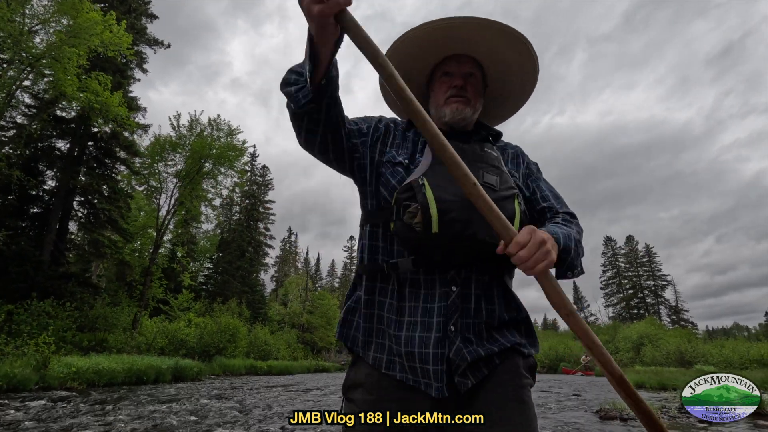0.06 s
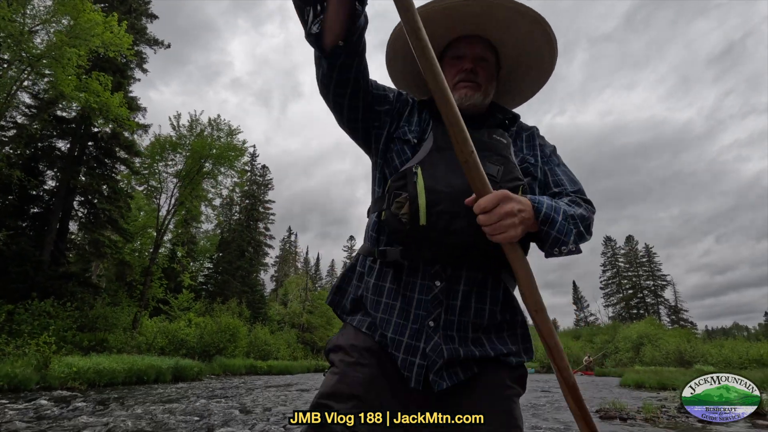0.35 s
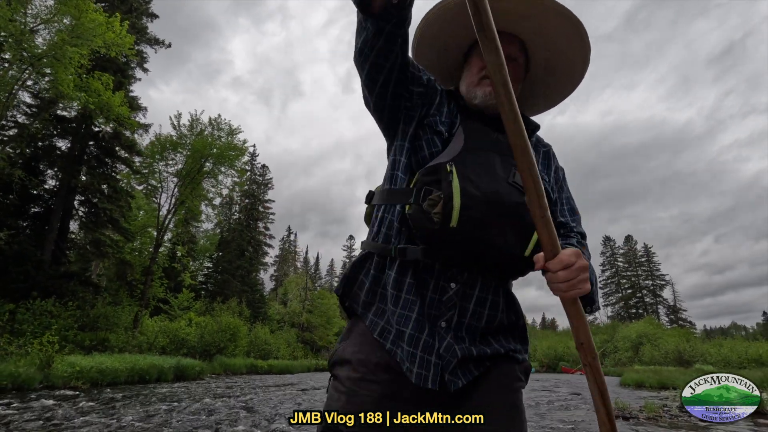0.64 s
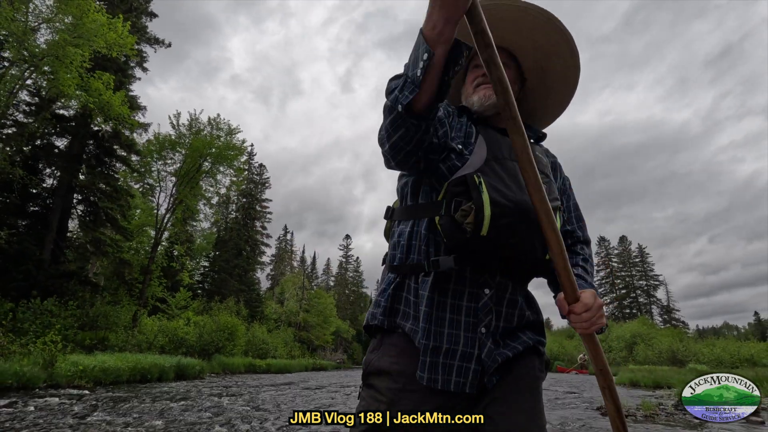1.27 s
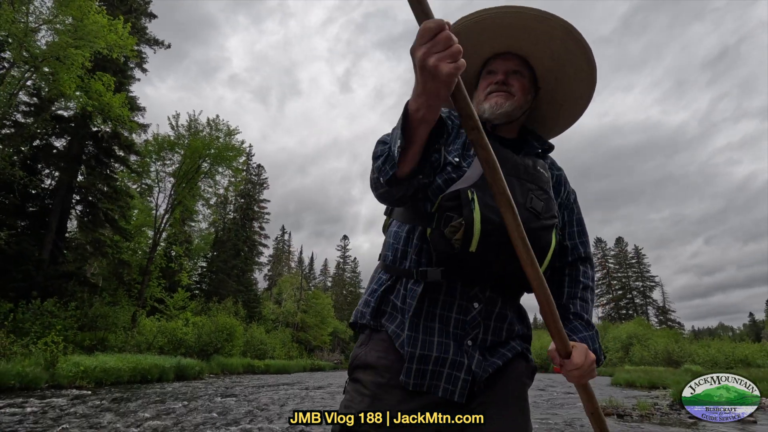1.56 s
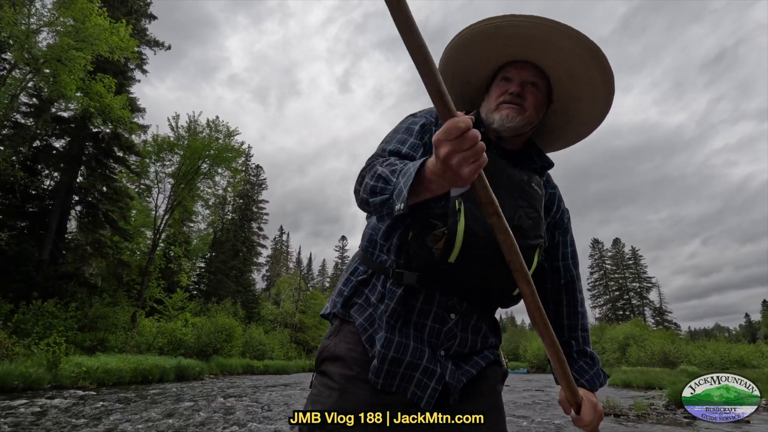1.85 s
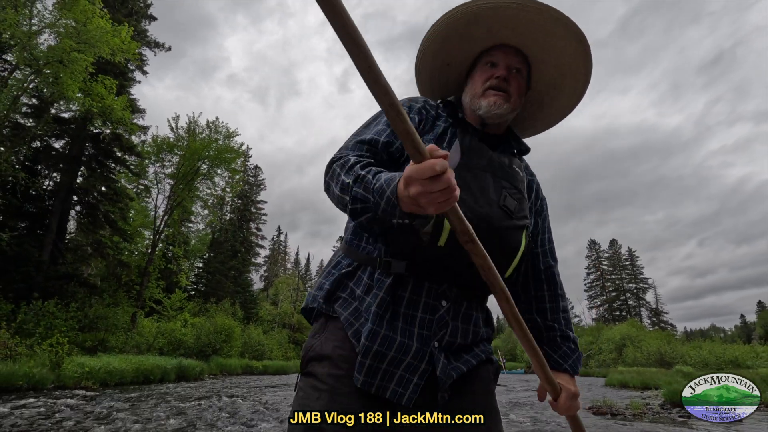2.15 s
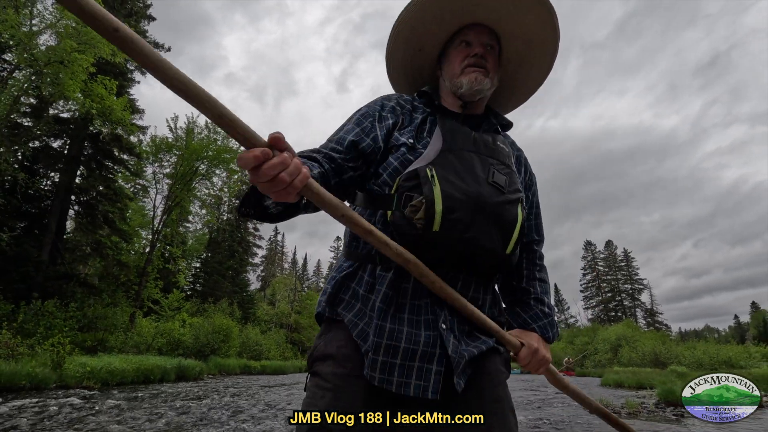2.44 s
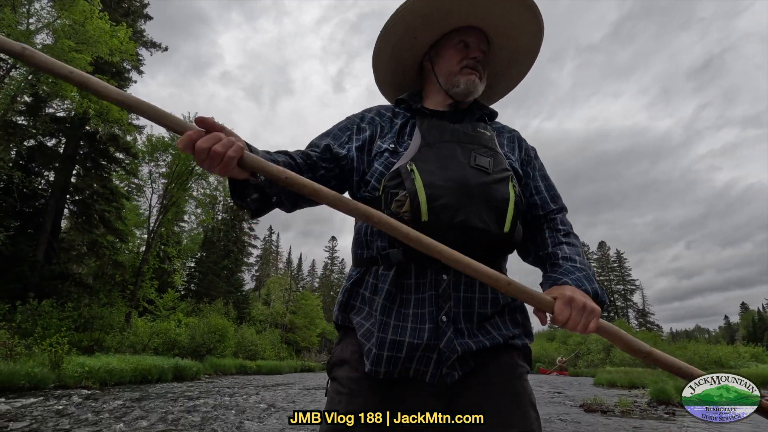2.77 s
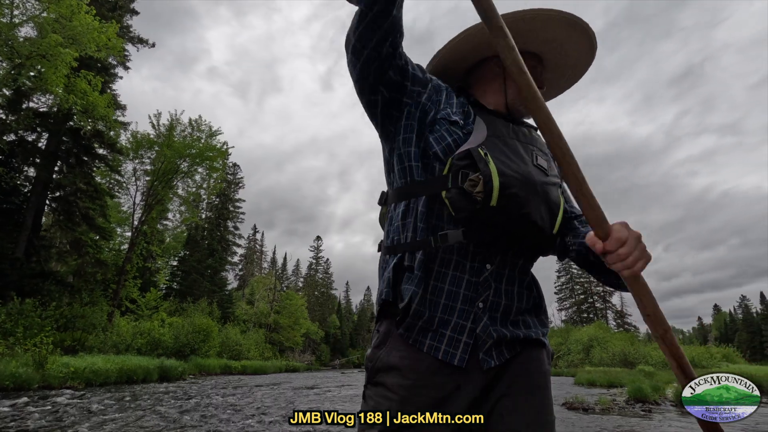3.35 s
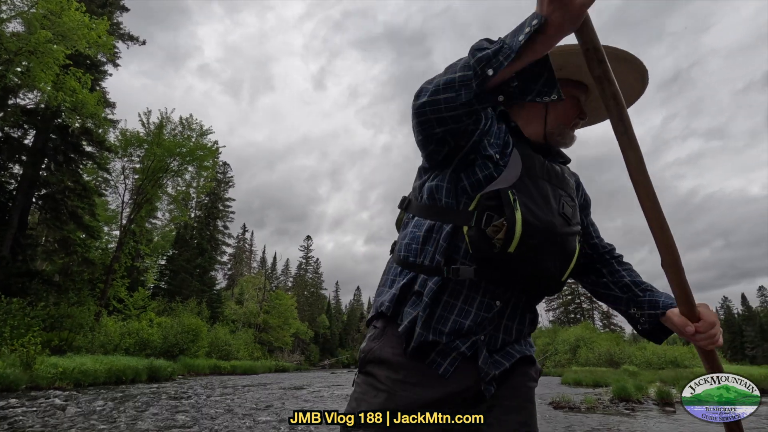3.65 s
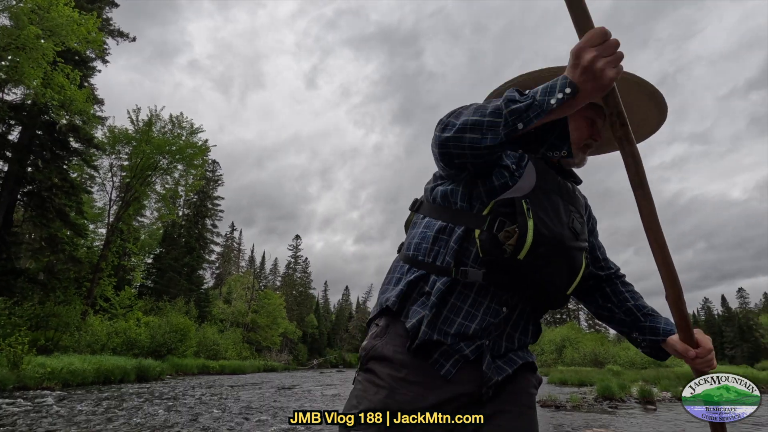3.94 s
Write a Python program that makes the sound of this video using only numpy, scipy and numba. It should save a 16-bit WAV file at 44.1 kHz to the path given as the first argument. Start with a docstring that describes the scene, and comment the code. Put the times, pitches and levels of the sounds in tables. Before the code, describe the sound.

Close up, a canoe is poled along a shallow, bubbling river: the wooden tip skids and knocks on rock as the hull thumps. A soft swish and slide follow, then a second burst of knocks, over light wind rumble.

```python
"""A short scrape of wood on stone, then hollow hull thumps: a canoe is poled up a shallow river.
In two strokes the pole's tip skids and knocks on stones, and each contact rings its bending modes.
Between them the pole swishes through the water and slides through the hands, and a few drops tick.
Underneath, the river rushes and bubbles and wind rumbles; the gain ducks after the loudest blows."""
import sys
import numpy as np
from scipy import signal
from scipy.fft import rfft, irfft
from scipy.io import wavfile
from scipy.ndimage import uniform_filter1d
from numba import njit

SR = 44100
rng = np.random.default_rng(int(sys.argv[2]) if len(sys.argv) > 2 else 0)


def materialize(psi):
    """Save the field psi as 16-bit PCM at rate SR to the path in sys.argv[1].

    A 1-D psi becomes a single channel; in a 2-D psi each row is a channel.
    """
    bounded = np.clip(np.atleast_2d(psi).T, -1, 1)
    quanta = np.round(bounded * 32767).astype(np.int16)
    wavfile.write(sys.argv[1], SR, quanta)


N = 176400
T = np.arange(N) / SR
F = np.maximum(np.fft.rfftfreq(N, 1 / SR), 1)

# tone of the wind rumble (f/Hz, relative level/dB)
WIND_SPECTRUM = [(22, 0.5), (55, 3), (100, -3.5), (200, -6.5), (350, -18)]
# level ride of the gusts (t/s, level/dB)
GUST_LEVELS = [(.15, -38), (.45, -26), (.7, -34), (.9, -24.5), (1.15, -33), (1.6, -30.5), (2.1, -34.5),
               (2.5, -42.5), (3.1, -40.5), (3.8, -41)]
# tone of the rushing water (f/Hz, relative level/dB)
RIVER_SPECTRUM = [(150, 5), (330, -1.5), (600, 1.5), (1050, -2), (2000, -10.5), (3600, -17), (6000, -31.5),
                  (10000, -38.5), (13000, -47), (15000, -56)]
# level ride of the river (t/s, level/dB)
FLOW_LEVELS = [(.2, -40.5), (.7, -41.5), (.88, -39), (1.25, -39), (1.6, -36.5), (1.8, -39), (2.2, -37),
               (2.45, -42), (3.3, -41.5), (3.8, -45)]
BUBBLES_PER_S, BUBBLE_HZ, BUBBLE_CYCLES, BUBBLE_SPREAD_DB, BUBBLE_DB = 490, 1100, 2.3, 30, -15
# close drops (t/s, level before filtering/dB)
DROP_TICKS = [(.846, -35), (1.037, -30.5), (1.05, -37), (1.467, -32.5), (3.937, -35.5)]
# hollow thumps of the hull (t/s, level/dB, f/Hz, rise/s)
HULL_THUMPS = [(0.016, -12.5, 247, 0.0042), (0.03, -13.5, 137, 0.01), (0.082, -20, 193, 0.0095),
               (0.25, -13.5, 189, 0.0049), (0.27, -23, 184.6, 0.0098), (0.29, -17.5, 159, 0.0065),
               (.315, -22, 129.6, 0.011), (0.433, -12, 164, 0.0028), (.442, -13.5, 171.6, 0.011),
               (0.493, -23.5, 212, 0.011), (.735, -20.5, 252, 0.0026), (0.826, -20, 121, 0.0067),
               (0.883, -17, 242, 0.0024), (0.932, -28, 199, 0.0032), (1.147, -16.5, 190.5, 0.0042),
               (1.194, -23.5, 217, 0.0036), (3.46, -15, 352.4, 0.008), (3.575, -25.5, 258, 0.013)]
OVERTONE_RATIO, OVERTONE_DB, RATTLE_DB = 1.7, -10.5, -16.5

# friction bands of wood in the hands (f/Hz, width/Hz, relative level/dB)
FRICTION_BANDS = [(3300, 340, -6.5), (4750, 750, -17)]
# swishes round the pole (peak t/s, rise/s, fall/s, level/dB, low f/Hz, top f/Hz)
WATER_SWISHES = [(1.922, 0.042, 0.055, -31.5, 1280, 4370), (1.996, 0.039, 0.018, -36.5, 1500, 5130),
                 (2.069, 0.014, 0.022, -29, 790, 3700), (2.13, 0.063, 0.073, -43, 1000, 3300),
                 (3.65, 0.06, 0.13, -47.5, 906, 3900)]
# hollow resonances of a swish (f/Hz, width/Hz, relative level/dB)
SWISH_RESONANCES = [(2320, 62, 6.5), (2970, 440, 0.5), (5450, 630, 8.5)]

# bending modes of the pole (f/Hz, t60 before grip/s, stroke 1 level/dB, stroke 2 level/dB)
POLE_MODES = [(382, .1, -12, -2), (565, .09, -4, -12), (675, .15, 2, -6), (874, .11, -7, -1),
              (975, .11, -9, -4), (1082, .09, -6, -14), (1227, .085, 4, -5), (1292, .07, -5, 1),
              (1512, .08, -16, 0), (1680, .06, -7, -4), (1905, .06, -16, -3), (2000, .055, -9, -1),
              (2320, .055, -9, -1), (2495, .07, -18, -4), (3150, .04, -3, -8), (3322, .05, -12, -3),
              (3692, .06, 3, -2), (4840, .025, -1, -22)]
# damping by the hands (share of ring time left in stroke 1, in stroke 2)
GRIP_RING_SHARES = (.95, .5)
SECOND_STROKE_S = 2.5  # later contacts ring the second set of modes
TRAVEL_S = 0.002245  # trip of a 1 kHz bending wave along the pole
# skids of the tip (peak t/s, rise/s, fall/s, level/dB, low f/Hz, top f/Hz)
TIP_SKIDS = [(.002, 0.006, 0.0049, -11.5, 380, 1730), (0.426, 0.0065, 0.0041, -22, 886, 1890),
             (0.44, 0.01, 0.0091, -44, 5870, 13000), (0.477, 0.014, 0.0079, -22, 803, 2704),
             (0.552, 0.0034, 0.017, -26, 460, 1490), (.562, 0.0071, 0.013, -25, 900, 4500),
             (0.622, 0.0078, 0.014, -38.5, 1500, 4170), (0.663, 0.011, 0.0086, -34.5, 703, 3930),
             (3.392, 0.0074, 0.0063, -18.5, 1900, 3630), (3.4, 0.0055, 0.0094, -15.5, 1480, 3360),
             (3.436, 0.0069, 0.0085, -18.5, 670, 2880), (3.448, .007, 0.009, -22.5, 325, 1500),
             (3.466, 0.017, 0.012, -20, 396, 3020), (3.517, 0.012, 0.0049, -27.5, 1014, 2710),
             (3.539, 0.026, 0.0078, -22, 837, 3750), (3.559, 0.01, 0.018, -21.5, 1210, 3520),
             (3.584, 0.023, 0.015, -18, 703, 5730), (3.865, 0.0062, 0.0089, -38.5, 1396, 3800),
             (3.898, 0.0065, 0.011, -35, 1160, 3700)]
SCRAPE_RING_DB, GRIT_DB, STONE_DB = 8.5, -19.5, -5
# knocks of the tip on stone (t/s, peak level/dB, centre f/Hz)
TIP_KNOCKS = [(0.4717, -4, 1350), (1.278, -22.5, 1520), (3.4031, -2, 1960), (3.434, -8.5, 1450),
              (3.4663, -9, 900), (3.514, -14, 1630), (3.536, -16, 1370), (3.579, -23.5, 780)]


def undb(db):
    """Decibels to amplitude."""
    return 10 ** (np.asarray(db) / 20)


def unit(x):
    """Scale to rms 1."""
    return x / np.sqrt(np.mean(np.abs(x) ** 2))


def ride(points):
    """Fader gain through (t/s, level/dB) points."""
    return undb(np.interp(T, *np.array(points).T))


def colour(points):
    """EQ curve through (f/Hz, level/dB) points, rolling off beyond the ends."""
    hz, db = np.array(points).T
    roll_off = np.minimum(F / hz[0], 1) ** 2 * np.minimum(hz[-1] / F, 1) ** 2
    return undb(np.interp(np.log(F), np.log(hz), db)) * roll_off


def edge(hz, kind, order):
    """Response of a causal low- or high-pass."""
    b, a = signal.butter(order, 1, kind, analog=True)
    return np.polyval(b, 1j * F / hz) / np.polyval(a, 1j * F / hz)


def resonance(hz, width):
    """Response of one resonance, gain 1 at its centre."""
    return 1 / (1 + 1j * (F ** 2 - hz ** 2) / (F * width))


def wander(per_s):
    """Smooth random modulation at rms 1."""
    hold = int(SR / per_s)
    steps = np.repeat(rng.standard_normal(N // hold + 1), hold)
    return unit(uniform_filter1d(uniform_filter1d(steps, hold), hold)[:N])


def grains(spread_db):
    """A dense stream of clicks of uneven size."""
    size = undb(spread_db * np.minimum(rng.exponential(size=N), 5))
    return unit(rng.choice([-1, 1], N) * size * (rng.random(N) < .15))


def swell(at, rise, fall):
    """Exponential rise to a peak and fall after it."""
    return np.exp(-np.maximum((at - T) / rise, (T - at) / fall))


def wind(buffet_db=2):
    """Gusts buffet the microphone with a low, fluttering rumble."""
    rumble = irfft(rfft(rng.standard_normal(N)) * colour(WIND_SPECTRUM), N)
    return unit(rumble * undb(buffet_db * wander(22.1))) * ride(GUST_LEVELS)


def bubbles():
    """Small bubbles ring and glide up, scattered over three octaves, the high ones softer."""
    age = T[:2048]
    out = np.zeros(N + len(age))
    for when, pitch, size in rng.random((int(BUBBLES_PER_S * N / SR), 3)):
        hz, start = BUBBLE_HZ * 2 ** (3 * (pitch - .5)), int(when * N)
        blip = np.exp(-age * hz / BUBBLE_CYCLES) * np.sin(2 * np.pi * hz * age * (1 + 7 * age))
        out[start:start + len(age)] += undb(BUBBLE_SPREAD_DB * size - 9 * pitch) * blip
    return unit(out[:N])


def river(flicker_db=2.5):
    """The bed of running water: bubbles in octave bands of noise, the low bands flickering most."""
    rush, noise = 0, rfft(rng.standard_normal(N)) * colour(RIVER_SPECTRUM)
    for hz in 125 * 2 ** np.arange(8):
        band = irfft(noise * np.maximum(1 - np.abs(np.log2(F / hz)), 0), N)
        depth_db = flicker_db * min(400 / hz, 1)
        rush += band * undb(depth_db * wander(25.12))
    return (unit(rush) + undb(BUBBLE_DB) * bubbles()) * ride(FLOW_LEVELS)


def drops(hz=3400, fall_s=.005):
    """Drops land close by, each a soft tick of bright noise."""
    envelope = sum(undb(db) * swell(at, fall_s / 2, fall_s) for at, db in DROP_TICKS)
    band = edge(hz, "high", order=2) * edge(hz, "low", order=2) * edge(9500, "low", order=3)
    return irfft(rfft(envelope * rng.standard_normal(N)) * band, N)


def hull_thumps(wobble_rad=0.98):
    """The hull booms for a few uneven low cycles, with a dull rattle on top."""
    dull = edge(150, "high", order=2) * edge(750, "low", order=3)
    out, rattle = 0, unit(irfft(rfft(grains(spread_db=4.5)) * dull, N))
    for at, db, hz, rise in HULL_THUMPS:
        age = np.maximum(T - at, 0)
        phase = 2 * np.pi * hz * age + wobble_rad * wander(150)
        ring = np.sin(phase) + undb(OVERTONE_DB) * np.sin(OVERTONE_RATIO * phase)
        envelope = age / rise * np.exp(1 - age / rise)
        out += undb(db) * envelope * (ring + undb(RATTLE_DB) * rattle)
    return out


def hand_slide(peak_s=2.11, rise_s=0.073, fall_s=0.12, gain_db=-41.5, glide_per_s=1.1):
    """Wood slips through the hands: two narrow bands of friction that rise a little in pitch."""
    glide = 1 + glide_per_s * np.clip(T - peak_s, -fall_s, rise_s)
    phase_per_hz = 2 * np.pi * np.cumsum(glide) / SR
    friction = 0
    for hz, width, db in FRICTION_BANDS:
        phase = hz * phase_per_hz
        friction += undb(db) * (wander(width) * np.sin(phase) + wander(width) * np.cos(phase))
    return undb(gain_db) * friction * swell(peak_s, rise_s, fall_s)


def swishes(spray_db=-15, flutter_db=1.7):
    """Water torn by the pole: a fizz of tiny grains through a few hollow resonances."""
    hollow = 1 + sum(undb(db) * resonance(hz, width) for hz, width, db in SWISH_RESONANCES)
    out, tone = 0, hollow * edge(2180, "low", order=2)
    for at, rise, fall, db, low_hz, top_hz in WATER_SWISHES:
        band = edge(low_hz, "high", order=1) * (edge(top_hz, "low", order=8) + undb(spray_db))
        fizz = grains(spread_db=2) * swell(at, rise, fall) * undb(flutter_db * wander(90))
        out += undb(db) * unit(tone * band) * rfft(fizz)
    return irfft(out, N)


def pole_ring(at):
    """Response of the pole's bending modes, damped by the grip of the stroke at this time."""
    stroke = int(at > SECOND_STROKE_S)
    ring = 0
    for hz, t60, *stroke_db in POLE_MODES:
        width = np.log(1000) / (np.pi * t60 * GRIP_RING_SHARES[stroke])
        ring += undb(stroke_db[stroke]) * resonance(hz, width)
    return ring


def pole_travel():
    """Bending waves run up the pole highs first, so a click arrives as a falling chirp."""
    return np.exp(-4j * np.pi * TRAVEL_S * np.sqrt(1000 * F))


def scrapes():
    """The tip skids: gritty clicks ring the pole, and a resonance shifts from stone to stone."""
    out, clicks = 0, grains(spread_db=4.5)
    grit = undb(GRIT_DB) * edge(8500, "low", order=3)
    for at, rise, fall, db, low_hz, top_hz in TIP_SKIDS:
        envelope = undb(db) * swell(at, rise, fall)
        contact = edge(low_hz, "high", order=2) * (edge(top_hz, "low", order=8) + grit)
        wood = (1 + undb(SCRAPE_RING_DB) * pole_ring(at)) * edge(4070, "low", order=2)
        out += unit(contact * wood) * rfft(np.roll(clicks, rng.integers(N)) * envelope)
        stone_hz = np.sqrt(low_hz * top_hz) * (1 + .12 * wander(45))
        stone = wander(260) * np.sin(2 * np.pi * np.cumsum(stone_hz) / SR)  # narrow noise band
        out += undb(STONE_DB) * rfft(stone * envelope)
    return irfft(out * pole_travel(), N)


def knocks(ring_db=9):
    """The tip hits a stone; the blow runs up the pole and leaves it ringing."""
    out = 0
    for at, db, hz in TIP_KNOCKS:
        blow = edge(hz * 0.28, "high", order=1) * edge(hz * 1.05, "low", order=4)
        arrival = pole_travel() * np.exp(-2j * np.pi * F * at)
        knock = irfft(blow * arrival * (1 + undb(ring_db) * pole_ring(at)), N)
        out += undb(db) * knock / np.abs(knock).max()
    return out


def scene():
    """Mono mix: pole and hull up front, over drops, river and wind."""
    pole = knocks() + scrapes() + swishes() + hand_slide()
    return (pole + hull_thumps() + drops() + river() + wind())[None]


@njit
def follow(x, attack_s, release_s):
    """Envelope follower."""
    out, level = np.empty(len(x)), 0.
    for i in range(len(x)):
        level += (x[i] - level) / (SR * (attack_s if x[i] > level else release_s))
        out[i] = level
    return out


def record(dry, threshold_db=-21, ratio=1.134, top_hz=15600):
    """Gentle compression ducks after loud blows; a steep low-pass trims the top."""
    level = follow(np.abs(dry[0]), attack_s=0.0082, release_s=1.)
    gain = np.maximum(level / undb(threshold_db), 1) ** (1 / ratio - 1)
    return signal.sosfilt(signal.ellip(8, .2, 70, top_hz, fs=SR, output="sos"), dry * gain)


dry = scene()
out = record(dry)
materialize(out)
```